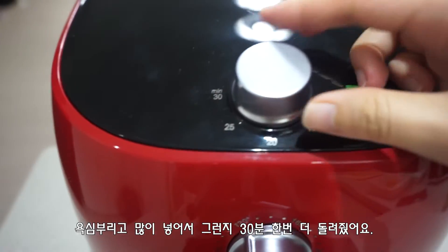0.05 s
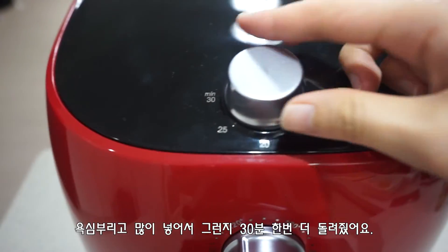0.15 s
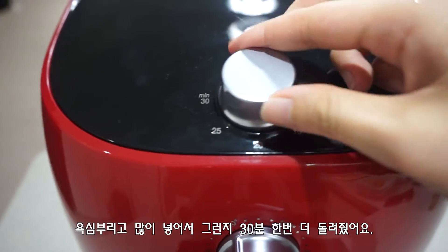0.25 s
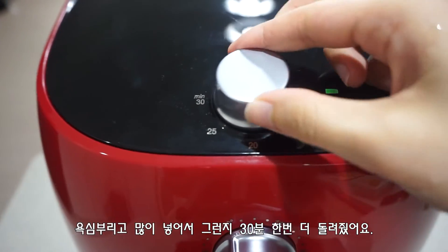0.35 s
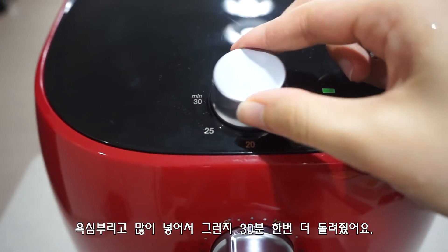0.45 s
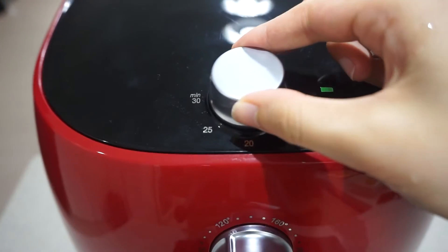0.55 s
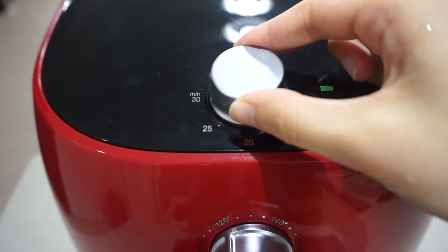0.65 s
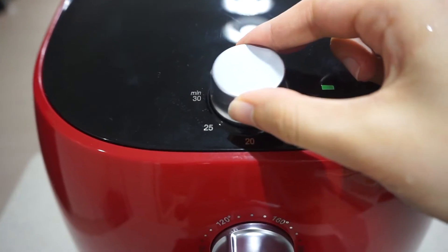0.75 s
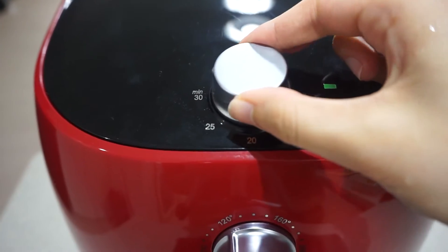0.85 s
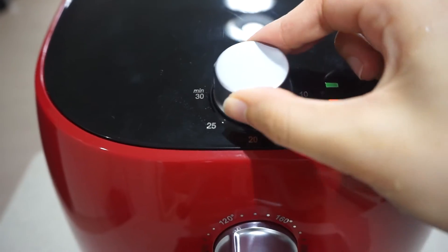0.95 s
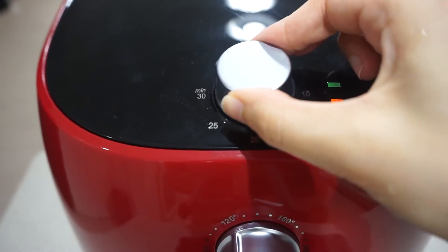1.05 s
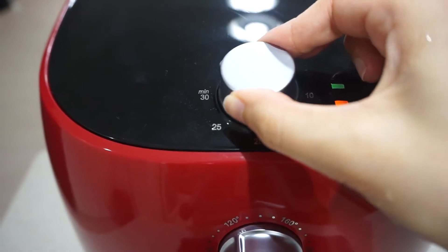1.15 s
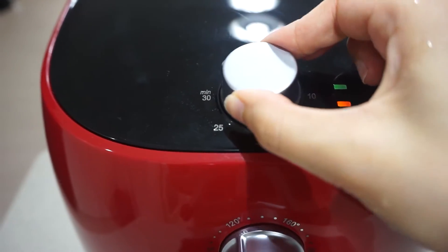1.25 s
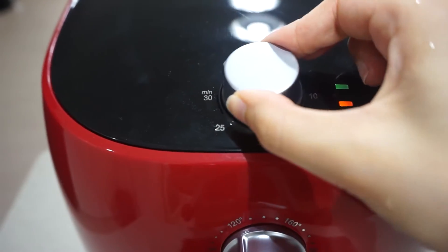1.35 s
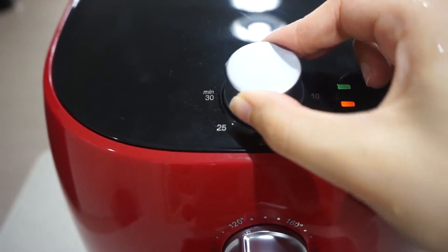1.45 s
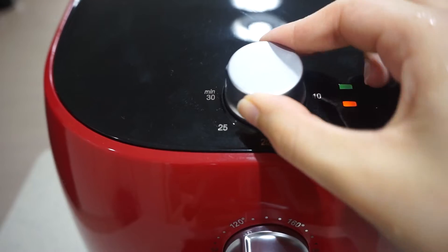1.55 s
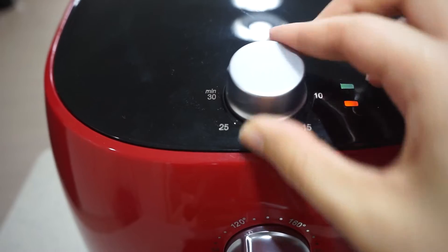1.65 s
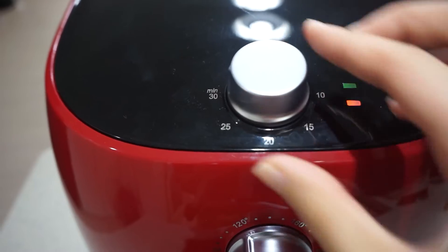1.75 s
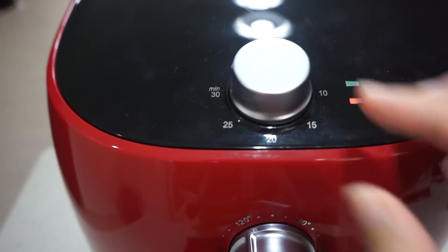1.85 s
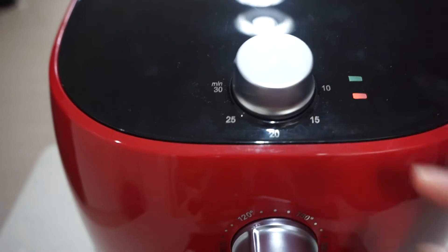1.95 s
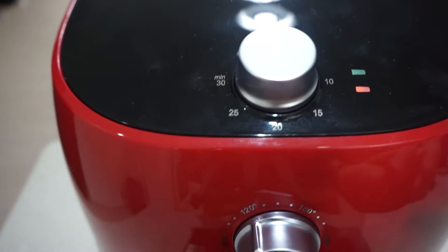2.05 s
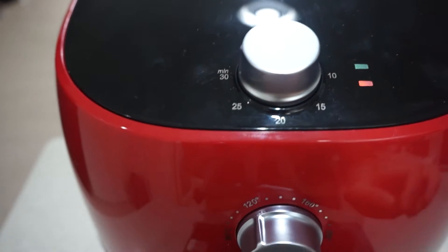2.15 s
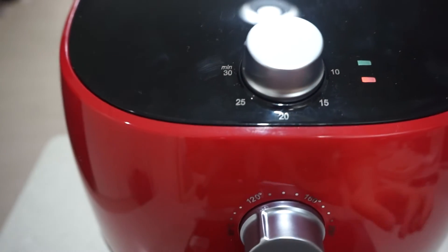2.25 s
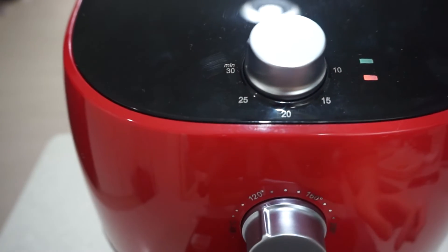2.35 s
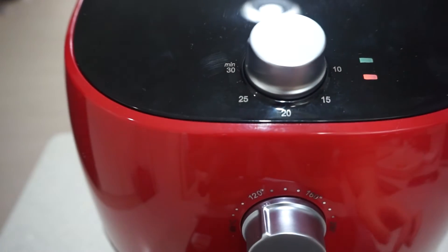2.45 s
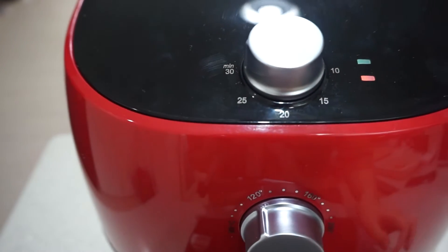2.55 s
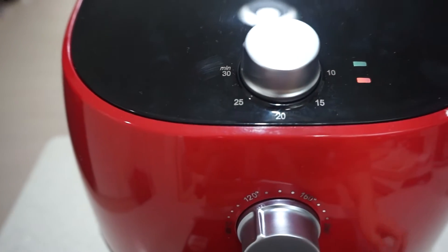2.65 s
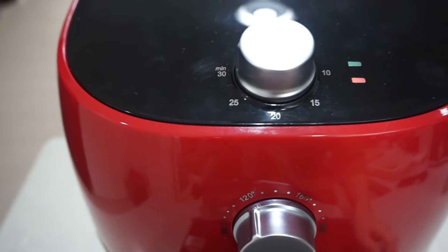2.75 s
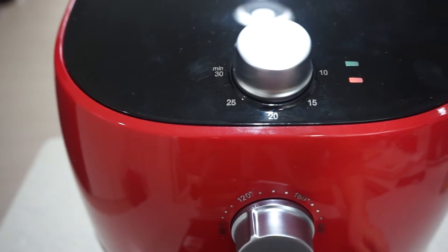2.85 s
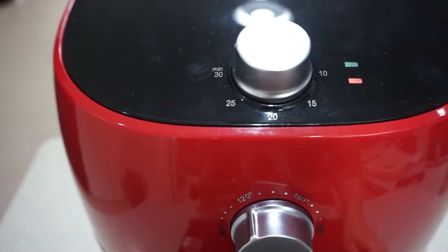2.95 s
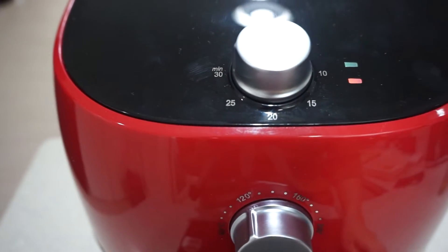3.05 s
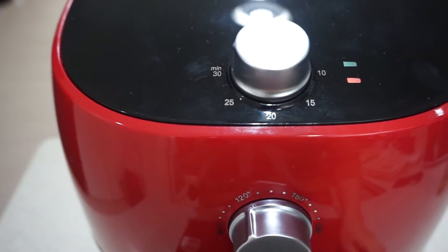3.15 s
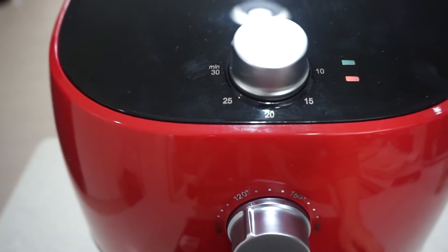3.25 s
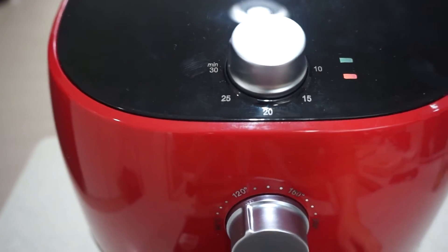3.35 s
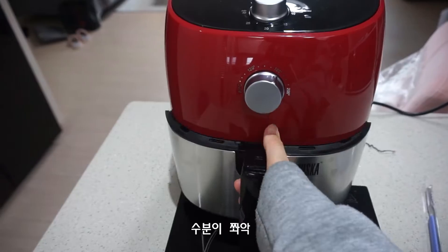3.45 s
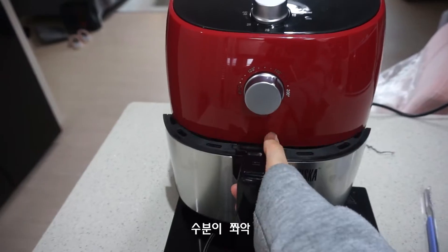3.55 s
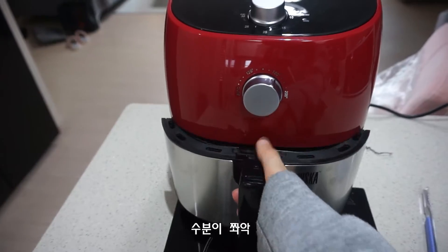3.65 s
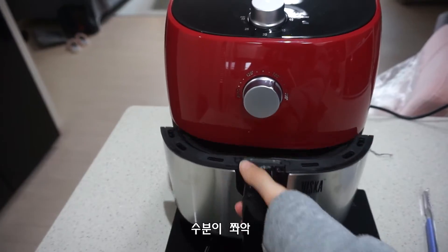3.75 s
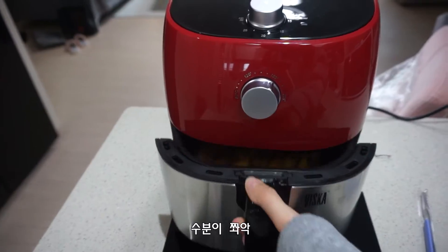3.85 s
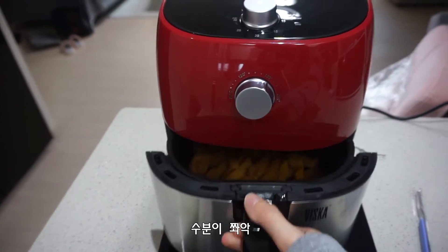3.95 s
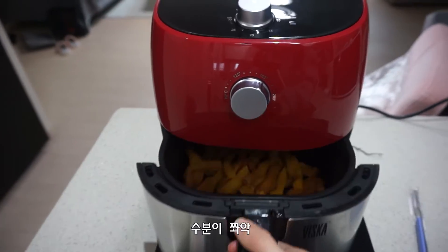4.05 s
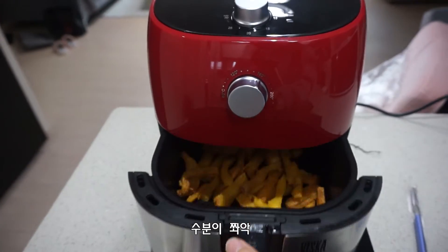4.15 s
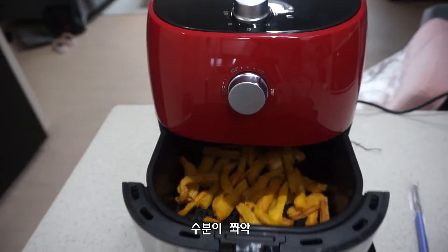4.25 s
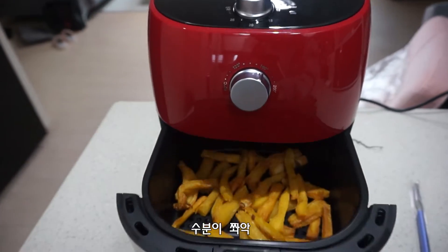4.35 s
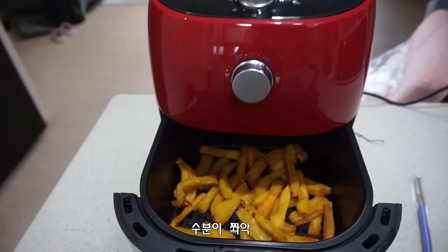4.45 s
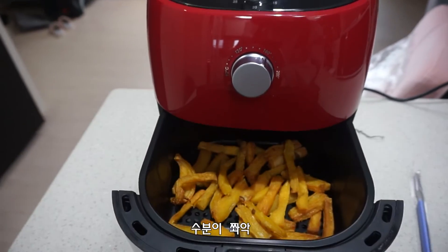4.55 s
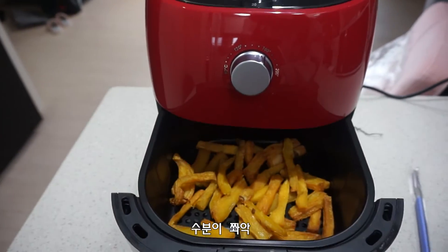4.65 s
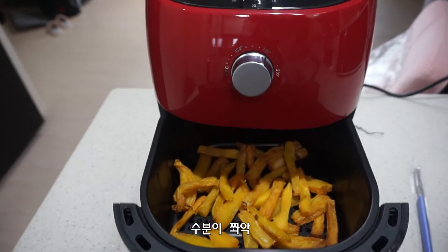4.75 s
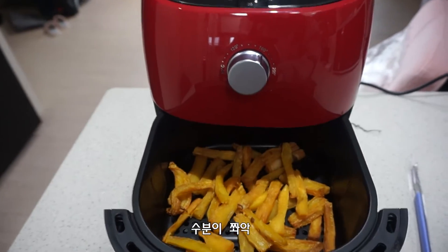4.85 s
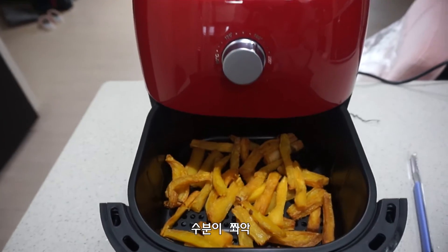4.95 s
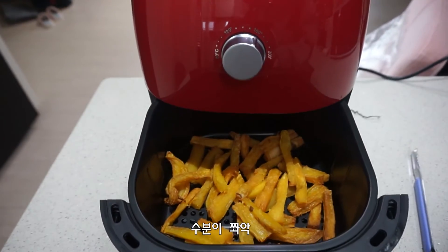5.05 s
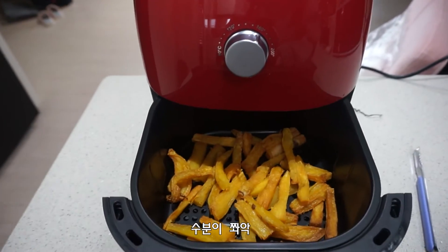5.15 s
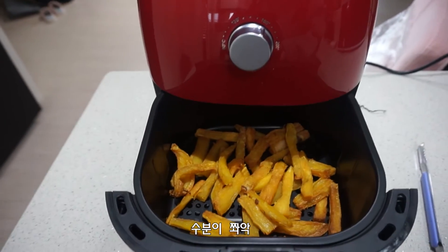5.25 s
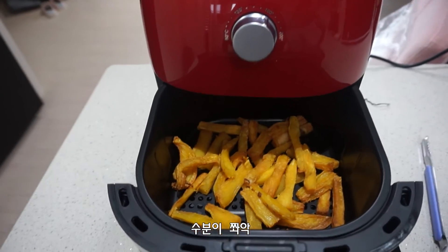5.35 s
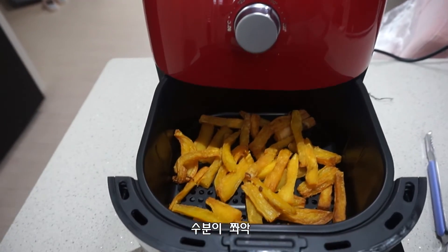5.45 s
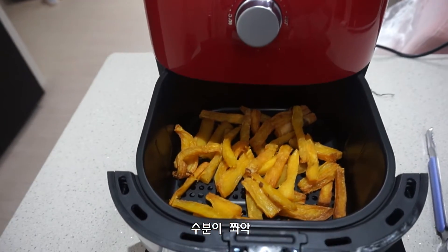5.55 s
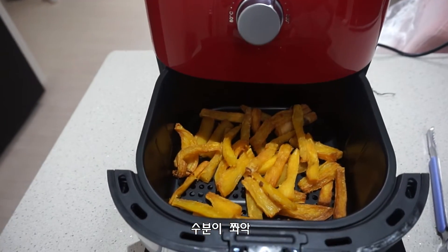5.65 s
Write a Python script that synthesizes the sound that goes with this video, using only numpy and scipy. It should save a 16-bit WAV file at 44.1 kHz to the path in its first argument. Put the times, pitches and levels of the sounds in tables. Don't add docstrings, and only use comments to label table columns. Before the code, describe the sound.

Close stereo in a tiled kitchen: an air fryer's fan hums low beneath faint clockwork ticks. A hand winds the timer knob in rasping ratchet bursts, the air roars slightly harder and ticking resumes. An abrupt cut drops the hum; in near quiet the basket is dragged out, grating and knocking on its rails, hits its stop, then settles with a small click.

```python
import sys
import numpy as np
from scipy import signal
from scipy.io import wavfile

SR = 44100
rng = np.random.default_rng(int(sys.argv[2]) if len(sys.argv) > 2 else 0)


def gain_from_db(level_db):
    decades = np.asarray(level_db, float) / 20
    return 10 ** decades


def wav_out(sig):
    wavfile.write(sys.argv[1], SR, np.round(np.clip(np.atleast_2d(sig).T, -1, 1) * 32767).astype(np.int16))


N = 250929

# (frequency [Hz], likeness [0 to 1])
LIKENESS = [(60, 0.68), (130, 0.99), (270, 0.86), (570, 0.11), (1220, 0.037), (2590, 0.031), (5490, 0.25),
            (11000, 0.55)]
TREBLE_LIMIT_HZ = 11060


def rms_one(x):
    return x / np.sqrt(np.mean(x ** 2) + 1e-20)


def in_time(rows):
    s, *columns = np.transpose(rows)
    return [np.interp(np.arange(N) / SR, s, column) for column in columns]


def at_hz(points, hz):
    known_hz, values = np.array(points)[:, 0], np.array(points)[:, 1]
    return np.interp(np.log(hz), np.log(known_hz), values)


def filtered(x, order, hz, kind):
    return signal.sosfilt(signal.butter(order, hz, kind, fs=SR, output="sos"), x)


def drift(rate):
    r = np.exp(-80 * np.pi * rate / SR)
    chance = rng.standard_normal(N // 40 + 2002)
    slow = signal.lfilter([1], [1, -2 * r, r * r], chance)[2000:]
    return np.interp(np.arange(N) / 40, np.arange(len(slow)), rms_one(slow))


def swell(start, attack, hold, level_db, release_db):
    t = np.arange(N) / SR - start
    rise = np.clip(t / attack, 0, 1) ** 2
    return rise * gain_from_db(level_db - release_db * np.maximum(t - attack - hold, 0))


def resonate(x, hz, width_hz):
    r = np.exp(-np.pi * width_hz / SR)
    w = 2 * np.pi * hz / SR
    return signal.lfilter([0, np.sin(w)], [1, -2 * r * np.cos(w), r * r], x + 1e-18)


def struck(s, level_db, hz, width_hz):
    t = np.maximum(np.arange(N) / SR - s, 0)
    return gain_from_db(level_db) * np.sin(2 * np.pi * hz * t) * np.exp(-np.pi * width_hz * t)


def two_ears(mid, side, alike):
    return np.sqrt(1 + alike) * mid + np.sqrt(1 - alike) * side * [[1], [-1]]


def placed(x, hz, alike):
    # (frequency [Hz], left minus right [dB])
    sideways = [(150, 0), (500, 1), (1200, -4), (2500, -6), (4500, -2), (11000, -3.5)]
    tilt_db = at_hz(sideways, hz) / 2
    ears = two_ears(x[0], x[1], np.clip(alike, 0, 1))
    return ears * gain_from_db(np.array([[tilt_db], [-tilt_db]])) / np.sqrt(2)


def banded(spectrum, drive, patchy_db):
    out, together = 0, drift(1.0)
    bottom, top = spectrum[0][0], min(spectrum[-1][0], 13000)
    edges = np.geomspace(bottom, top, int(3 * np.log2(top / bottom)))
    for k, (low, high) in enumerate(zip(edges, edges[1:])):
        mid, side = filtered(drive[k % 2], 2, [low, high], "band")
        hz = np.sqrt(low * high)
        flicker_db = patchy_db * (0.2 * together + drift(12.8))
        gain = gain_from_db(at_hz(spectrum, min(hz, TREBLE_LIMIT_HZ - 500)) + flicker_db)
        out = out + gain * two_ears(mid, side, np.clip(at_hz(LIKENESS, hz), 0, 1))
    return rms_one(out)


def chatter(events, modes, fall_s, spread_db, alike, own_db):
    t = np.arange(round(.03 * SR)) / SR
    shape = np.sqrt(t / fall_s) * np.exp(-t / fall_s)
    bounces = rng.standard_normal((len(events), 2, len(t))) * shape / np.sqrt(np.sum(shape ** 2))
    strength_db = spread_db * rng.standard_normal((len(events), len(modes))) + own_db
    start = round(events[0][0] * SR)
    stop = min(round((events[-1][0] + .4) * SR), N)
    rings = np.zeros((len(modes), 2, N))
    for k, (hz, width_hz, level_db) in enumerate(modes):
        force = np.zeros((2, stop - start))
        for event, bounce, extra_db in zip(events, bounces, strength_db[:, k]):
            at = round(event[0] * SR) - start
            ring = resonate(bounce[0], hz, width_hz)
            usual = np.sqrt(SR / (4 * np.pi * width_hz) / np.sum(ring ** 2))
            force[:, at:at + len(t)] += gain_from_db(event[1] + extra_db + level_db) * usual * bounce
        rings[k, :, start:stop] = placed(resonate(force, hz, width_hz), hz, alike) * (-1) ** k
    return rings


def kitchen(x):
    # (frequency [Hz], time to fall 60 dB [s])
    t60 = [(200, 0.7), (1000, 0.45), (4000, 0.36), (11000, 0.19)]
    t = np.arange(SR // 2) / SR
    noise, tail = rng.standard_normal((2, len(t))), 0
    for low in 100 * 2. ** np.arange(7):
        mid, side = filtered(noise, 2, [low, 2 * low], "band")
        centre_hz = low * np.sqrt(2)
        band = two_ears(mid, side, np.clip(at_hz(LIKENESS, centre_hz), 0, 1))
        tail = tail + band * gain_from_db(-60 * t / at_hz(t60, centre_hz))
    tail = tail * np.clip(t / 0.0012, 0, 1) / np.sqrt(np.sum(tail ** 2))
    return signal.fftconvolve(x, tail, axes=1)[:, :N]


def with_room(rings, low_hz, room_db):
    ringing, crack = filtered([rings[:-1].sum(axis=0), rings[-1]], 2, low_hz, "high")
    return ringing + crack + gain_from_db(room_db) * kitchen(gain_from_db(-11) * ringing + crack)


def fan():
    # (frequency [Hz], density [dB per Hz])
    rumble = [(20, -21.5), (80, -18), (105, -8), (135, -17.5), (165, 3), (240, -2), (330, -11.5),
              (520, -10.5), (760, -14.5), (900, -21.5), (1400, -25.5), (2500, -36)]
    # (frequency [Hz], density [dB per Hz])
    hiss = [(470, -62), (800, -5), (1370, -10), (1690, -15), (2850, -19), (3120, -19), (11000, -27.5),
            (14300, -55), (22000, -120)]
    # (frequency [Hz], level [dB], wander [Hz])
    hum = [(120.1, -59.5, 0.04), (206, -69.5, 4.83), (154.4, -62.5, 7.73), (241.9, -63, 0.49),
           (373.3, -72, 5.66), (483.3, -74.5, 3.08), (752, -77.5, 6.6), (1000, -90, 3.8)]
    heater_on_s, heater_gain_db = 0.45, 3
    heated = np.clip((np.arange(N) / SR - heater_on_s) / 0.072, 0, 1)
    white = rng.standard_normal((2, 2, N))
    air = gain_from_db(-55 - heater_gain_db * (1 - heated)) * banded(rumble, white, patchy_db=-0.5)
    winding = swell(.5, attack=.12, hold=.45, level_db=-61, release_db=38)
    air += np.hypot(gain_from_db(-69), winding) * banded(hiss, white[::-1], patchy_db=0.2)
    for hz, level_db, wander_hz in hum:
        turns = np.cumsum(hz + wander_hz * drift(6.04)) / SR
        gain = gain_from_db(level_db + 1.73 * wander_hz ** .5 * drift(21))
        air += gain * np.sqrt(2) * np.sin(2 * np.pi * turns)
    brush = rms_one(filtered(white[0] ** 3, 3, [850, 1800], "band"))
    return air + swell(2.385, attack=.015, hold=.06, level_db=-62, release_db=150) * brush


def escapement():
    # (time [s], peak level [dB])
    ticks = [(0.026, -42), (0.2464, -48), (0.4643, -64), (1.612, -46), (1.632, -53), (1.6901, -58.5),
             (1.7628, -43), (1.988, -48), (2.1943, -43.5), (2.4203, -46.5), (2.6296, -44.5), (2.853, -47),
             (3.0684, -41), (3.2936, -46)]
    # (frequency [Hz], width [Hz], level [dB])
    clockwork = [(2140, 117, 0.5), (3130, 230, -1), (3950, 790, 7), (4480, 190, -4.5), (5363, 153, -1.5),
                 (6340, 400, -0.5), (7960, 900, 3), (9130, 490, -3), (10700, 850, -1), (5000, 3700, 4)]
    case_mode_db, case_follows = -47.5, 0.12
    own_db = np.zeros((len(ticks), len(clockwork)))
    own_db[:, 0] = np.minimum((case_follows - 1) * (np.array(ticks)[:, 1] - case_mode_db), 8.0)
    beats = chatter(ticks, clockwork, fall_s=0.0036, spread_db=0.5, alike=0.67, own_db=own_db)
    return gain_from_db(-5.0) * with_room(beats, low_hz=1100, room_db=7)


def teeth():
    # (time [s], peak level [dB])
    drops = [(0.484, -41), (0.4994, -37.5), (0.561, -33), (0.5731, -31.5), (0.623, -33.5), (0.6348, -35),
             (0.6454, -33.5), (0.6566, -33), (0.6759, -32.5), (0.728, -33.5), (0.7435, -32.5),
             (0.763, -32.5), (0.7967, -34), (0.821, -36.5), (0.8424, -33.5), (0.8663, -34.5), (0.9114, -36),
             (1.1597, -36.5)]
    # (start [s], first gap [s], last gap [s], first level [dB], last level [dB])
    twists = [
        (0.5107, .0075, .0062, -37, -33),
        (0.931, .0095, .005, -32, -32.5),
    ]
    jitter_s, spread_db = .0006, 1.5
    rows = list(drops)
    for (s, first, last, first_db, last_db), count in zip(twists, (7, 13)):
        times = s + np.cumsum(np.r_[0, np.linspace(first, last, count - 1)])
        levels_db = np.linspace(first_db, last_db, count)
        chance = rng.standard_normal((count, 2)) * [jitter_s, spread_db]
        rows += list(np.c_[times, levels_db] + chance)
    return sorted(rows, key=lambda row: row[0])


def ratchet():
    # (frequency [Hz], width [Hz], level [dB])
    knob = [(506, 32, -13.5), (782, 19.5, -20.5), (1140, 49, -14.5), (1414, 38, -11.5), (1890, 124, 4.5),
            (2350, 1800, 11.5), (2530, 1500, -11), (3190, 154, -5), (3790, 76, -7), (4500, 730, 0),
            (5280, 450, 0.5), (6240, 150, -6), (7780, 310, -7.5), (9250, 770, 0.5), (10810, 430, -3.5),
            (1880, 59, -8.5), (2020, 40, -20), (1650, 300, -6), (3910, 22, -24), (4196, 63, -16),
            (4310, 56, -9), (6350, 61, -9.5), (1930, 970, 6.5)]
    rasp = chatter(teeth(), knob, fall_s=0.0022, spread_db=1.0, alike=0.83, own_db=-0.5)
    return gain_from_db(-3) * with_room(rasp, low_hz=420, room_db=3.0)


def room_tone():
    # (frequency [Hz], density [dB per Hz])
    quiet = [(15, -18), (25, -11.5), (87, -16.5), (685, -8), (819, -14.5), (954, -13.5), (1360, -15.5),
             (2050, -24.5), (2640, -25), (3680, -29), (11000, -34), (14300, -59), (22000, -120)]
    cloth = swell(4.5, attack=.38, hold=.02, level_db=-60, release_db=25)
    tone = np.hypot(gain_from_db(-67), cloth) * banded(quiet, rng.standard_normal((2, 2, N)), patchy_db=1.0)
    return tone * gain_from_db(np.array([[.8], [-.8]]))


def near_basket(x, hz):
    # (frequency [Hz], left-right likeness [0 to 1])
    near_likeness = [(130, 1), (270, 0.93), (570, 0.94), (1220, 0.7), (2590, 0.56), (5490, 0.29),
                     (11000, .5)]
    return placed(x, hz, at_hz(near_likeness, hz))


def stick_slip_grains():
    sizes = gain_from_db(2.2 * np.minimum(rng.exponential(1, (2, 2, N)), 5))
    signs = rng.choice([-1, 1], (2, 2, N))
    return sizes * signs * (rng.random((2, 2, N)) < 6000 / SR)


def body_and_walls(grains, body_hz, wall_hz):
    # (frequency [Hz], width [Hz], level [dB])
    basket = [(225, 98, 7.5), (303, 51, 2), (364, 25, 4), (475, 27, 7), (640, 104, 7.5), (740, 110, -1.5),
              (860, 96, 3), (1052, 217, 3), (1475, 180, 4), (1596, 30, -1), (1811, 10.4, -1),
              (2180, 180, -20)]
    parts, power = [0, 0], [0, 0.034]
    for k, (hz, width_hz, level_db) in enumerate(basket):
        wall = int(k > 4)
        favoured_hz = wall_hz if wall else body_hz
        rung = rms_one(resonate(resonate(grains[k % 2], hz, width_hz), hz, 6.1 * width_hz))
        octaves_off = np.abs(np.log2(hz / favoured_hz))
        gain = gain_from_db(level_db - 9.8 * octaves_off + 3.4 * drift(3.1))
        parts[wall] += gain * near_basket(rung, hz)
        power[wall] += gain ** 2
    return parts[0] / np.sqrt(power[0]), parts[1] / np.sqrt(power[1])


def bright_friction(grains, air_db):
    # (frequency [Hz], density [dB per Hz])
    grating = [(1060, -62), (1800, 10.5), (1940, -3), (2400, -3.5), (3700, -4.5), (4570, -10.5),
               (5960, -11.5), (10500, -26.5), (11000, 15), (14300, -56), (22000, -120)]
    # (frequency [Hz], width [Hz], level [dB])
    rails = [(2427, 75, -12.5), (2850, 82, -14.5), (3586, 200, -15.5), (4520, 33, -20), (4740, 73, -28),
             (5240, 71, -24)]
    friction = banded(grating, grains, patchy_db=2.0) * gain_from_db(np.array([[-2.2], [2.2]]))
    for hz, width_hz, level_db in rails:
        rung = rms_one(resonate(grains[0], hz, width_hz))
        friction += gain_from_db(level_db + 3 * drift(8)) * near_basket(rung, hz)
    return friction + gain_from_db(air_db) * filtered(friction, 2, 5930, "high")


def groan(grains):
    hz, width_hz = 1134, 120
    rung = rms_one(resonate(resonate(grains[1], hz, width_hz), hz, 3 * width_hz))
    rise = swell(3.96, attack=.03, hold=.05, level_db=-45, release_db=110)
    return gain_from_db(-4) * rise * near_basket(rung, hz)


def drag():
    # (time [s], level [dB])
    nudge = [(3.51, -63), (3.576, -56.5), (3.704, -67.5)]
    # (time [s], level [dB])
    pull = [(3.828, -53.5), (3.94, -48), (4.014, -44), (4.08, -49), (4.168, -44.5), (4.28, -49)]
    # (time [s], level [dB])
    end_stop = [(4.374, -45), (4.408, -38.5), (4.434, -43.5), (4.456, -39), (4.558, -59), (4.608, -63.5),
                (4.722, -74.5)]
    # (time [s], level [dB])
    settle = [(4.76, -64), (4.8, -59.5), (4.856, -55), (4.922, -55.5), (4.984, -67.5), (5.04, -80)]
    # (from [Hz], to [Hz])
    stroke_body_hz = [
        (400, 290),
        (358, 760),
        (324, 264),
        (320, 295),
    ]
    # (start [s], attack [s], hold [s], level [dB], release [dB per s])
    judders = [
        (4.0, 0.028, .005, -55, 250),
        (4.112, 0.05, 0.0067, -49, 97),
        (4.366, 0.033, 0.019, -36, 247),
        (4.752, 0.039, 0.0091, -74, 86),
        (4.862, 0.029, 0.0046, -56, 242),
    ]
    strokes = (nudge, pull, end_stop, settle)
    stroke_air_db = (-29, -4.5, -14, 1.5)
    rows, air_rows = [], []
    for stroke, ends, air in zip(strokes, stroke_body_hz, stroke_air_db):
        glide_hz = np.geomspace(*ends, len(stroke))
        rows += [(*row, hz) for row, hz in zip(stroke, glide_hz)]
        air_rows += [(s, air) for s, _ in stroke]
    speed_db, body_hz = in_time(rows)
    air_db, = in_time(air_rows)
    body_hz = body_hz * 2 ** (0.04 * drift(5.1))
    wall_hz = 1020 * 2 ** (0.021 * drift(14.0))
    load = gain_from_db(-50.5 + 0.51 * (speed_db + 50)) + sum(swell(*judder) for judder in judders)
    friction_db = -54.5 + 0.98 * (speed_db + 50)
    grains = stick_slip_grains()
    body, walls = body_and_walls(grains, body_hz, wall_hz)
    sliding = load * body + gain_from_db(speed_db + 0.1) * walls
    sliding = sliding + gain_from_db(friction_db) * bright_friction(grains, air_db)
    return groan(grains) + sliding, load


def shudder(load):
    sway = swell(4.4, attack=.1, hold=.12, level_db=-43, release_db=90)
    low_noise = rms_one(filtered(rng.standard_normal(N), 2, (50, 125), "band"))
    return gain_from_db(-29) * (load + sway) * low_noise


def knocks():
    # (time [s], ring level [dB], ring [Hz], crack level [dB], extra brightness [dB])
    rail_knocks = [
        (3.979, -30.5, 1136, -41, -1),
        (4.008, -27.5, 1060, -51, -3),
        (4.155, -49, 455, -53, -6),
        (4.3188, -30, 1660, -29.5, -26),
        (4.325, -30.5, 1650, -40, -18),
        (4.398, -25.5, 740, -26.5, 6.5),
        (4.409, -29, 225, -32, 1),
        (4.455, -48, 330, -46, -11),
        (5.012, -50, 600, -86, 0),
    ]
    # (frequency [Hz], width [Hz], level [dB])
    crack = [(1310, 1100, 5), (2600, 830, 1.5), (3320, 930, -3), (5760, 970, -5.5), (8600, 3200, 0)]
    # (frequency [Hz], width [Hz], level [dB])
    latch = [(606, 18, -9), (1300, 670, -9), (2180, 230, -8), (2720, 210, -7), (3300, 310, -6),
             (5300, 750, -1), (7300, 1500, 0.5)]
    latch_click = (5.012, -43.5)    # s, dB
    out = chatter([latch_click], latch, fall_s=0.0007, spread_db=-2, alike=0.5, own_db=3).sum(axis=0)
    for s, ring_db, hz, crack_db, bright_db in rail_knocks:
        width_hz = 45 + 43 * (hz / 1000) ** 2
        ring = struck(s, ring_db, hz, width_hz)
        out += placed([ring, ring], hz, 1.0)
        own_db = bright_db * (np.array(crack)[:, 0] > 4000)
        cracks = chatter([(s, crack_db)], crack, fall_s=0.0016, spread_db=-2.5, alike=0.8, own_db=own_db)
        out += cracks.sum(axis=0)
    return out + gain_from_db(-12) * kitchen(out)


def thud():
    return struck(4.405, level_db=-59, hz=58, width_hz=6)


def scene():
    change_s = 3.51
    t = np.arange(N) / SR
    second = np.clip((t - change_s) / 0.0064 + .5, 0, 1)
    running = fan() + escapement() + ratchet()
    sliding, load = drag()
    basket = sliding * np.clip((5.1 - t) / 0.16, 0, 1) + knocks()
    basket = filtered(basket, 4, 175, "high")
    opening = room_tone() + basket + shudder(load) + thud()
    return running * (1 - second) + opening * second


def roll_off(x):
    return signal.sosfilt(signal.butter(12, 12260, fs=SR, output="sos"), x)


def record(dry):
    dull = signal.sosfilt(signal.ellip(12, .5, 55, TREBLE_LIMIT_HZ, fs=SR, output="sos"), dry)
    return roll_off(dull)


dry = scene()
out = record(dry)
wav_out(out)
```